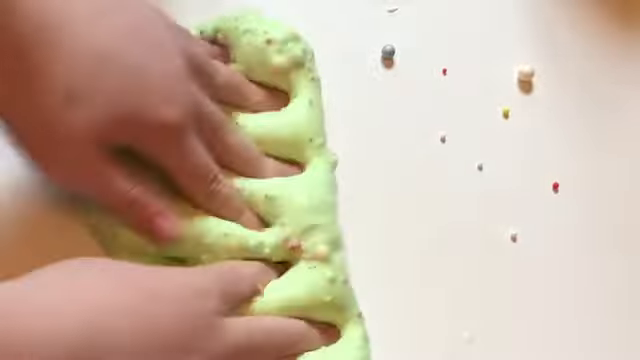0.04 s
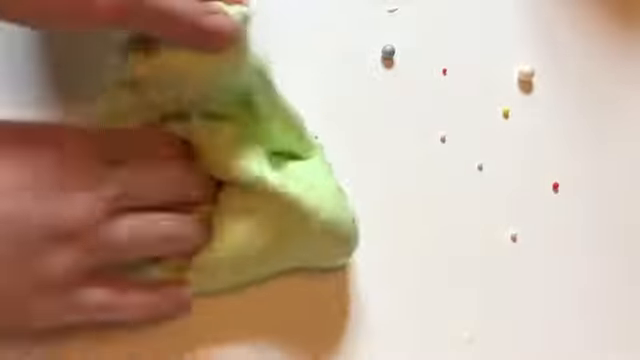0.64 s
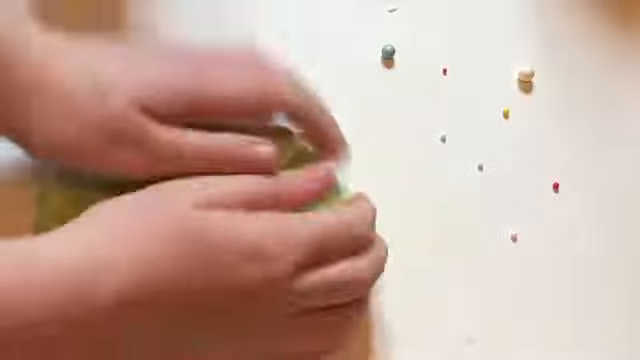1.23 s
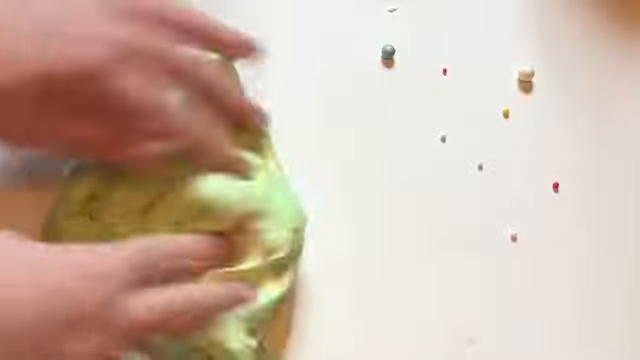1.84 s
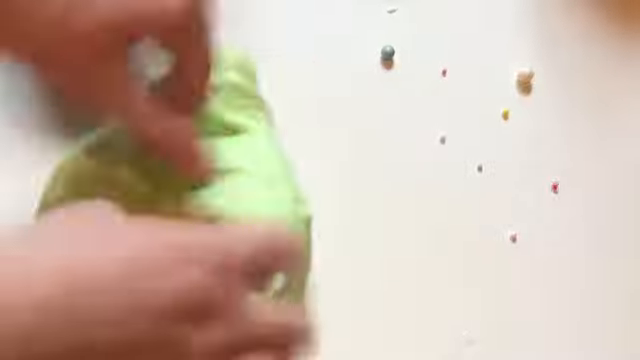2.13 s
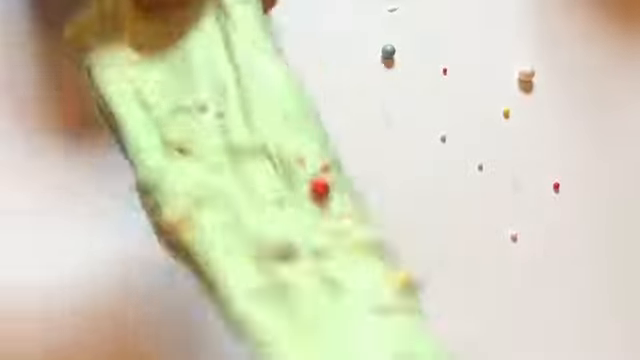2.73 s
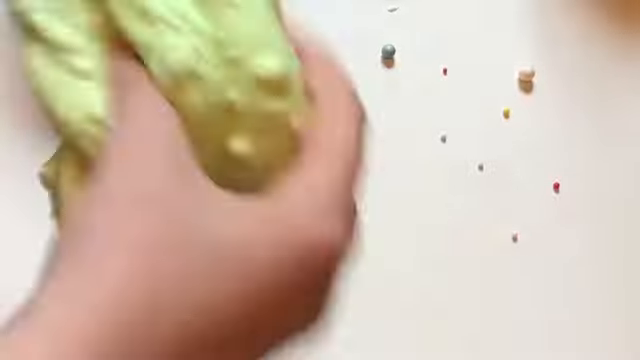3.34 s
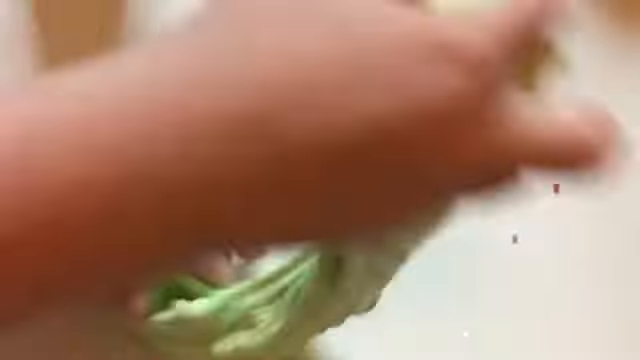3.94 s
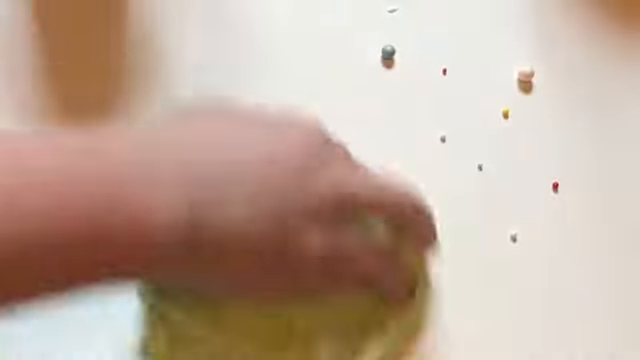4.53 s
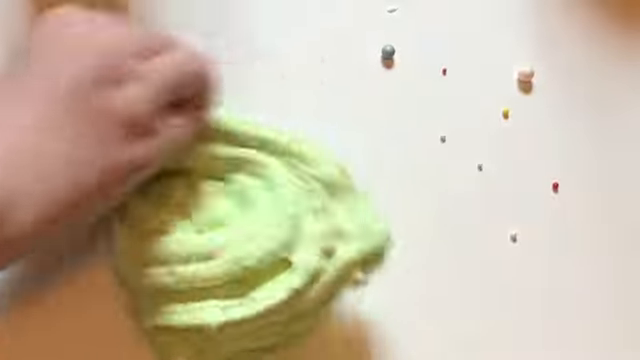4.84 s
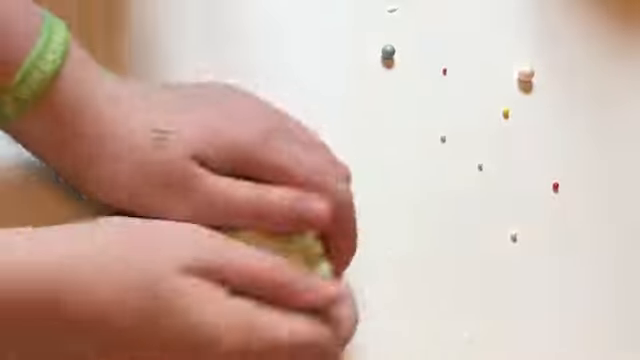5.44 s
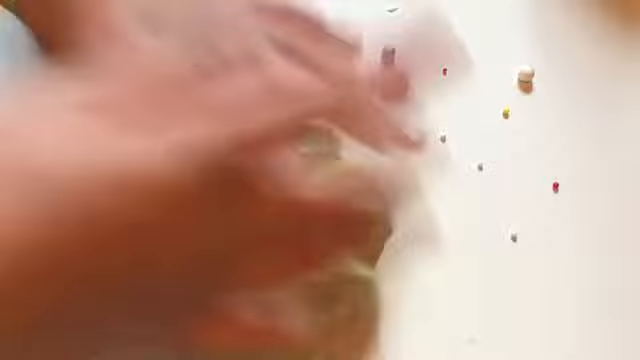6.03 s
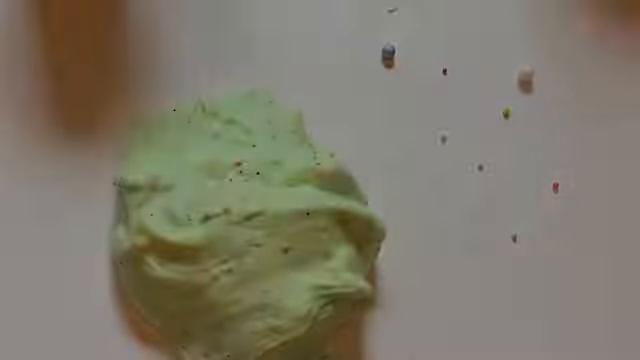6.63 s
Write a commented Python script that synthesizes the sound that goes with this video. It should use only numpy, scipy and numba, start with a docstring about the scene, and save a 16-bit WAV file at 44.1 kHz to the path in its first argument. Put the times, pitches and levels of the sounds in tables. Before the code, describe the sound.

Hands knead and stretch sticky slime close by, making wet crackles, squelches and sharp snaps of bursting air pockets.

```python
"""Over faint room tone, a wet crackle swells into snaps: two hands knead slime on a table, close by.
Trapped air pockets snap open or gulp out with a sliding pitch, loudest near 1.6 s and 5.7 s.
Tiny pores and tacky threads crackle as the slime is pressed, folded, stretched and peeled.
The walls of the small room answer each snap."""
import sys
import numpy as np
from scipy import signal
from scipy.fft import rfft, irfft
from scipy.io import wavfile
from scipy.ndimage import uniform_filter1d
from numba import njit

SR = 44100
rng = np.random.default_rng(int(sys.argv[2]) if len(sys.argv) > 2 else 0)


def transcribe(signal):
    """Save signal, clipped to [-1, 1], as a 16-bit WAV file at the path in sys.argv[1]."""
    frames = np.atleast_2d(signal).T
    limited = np.clip(frames, -1, 1)
    pcm = np.round(limited * 32767).astype(np.int16)
    wavfile.write(sys.argv[1], SR, pcm)


N = 294569

# steady rumble and hiss: freq_hz, gain_db
ROOM_TONE_SPECTRUM = [(20, -20.5), (40, -10), (65, 0.5), (105, 3), (180, -0.5), (400, -4.5), (1000, -12),
                      (2100, -15), (5000, -20.5), (15000, -24), (16000, -23)]
# hands press or fold, levels before layer trim: full_effort_s, hold_s, squash_db, pores_db, threads_db
PRESS_STROKES = [(0.174, 0.031, -49.5, -51, -52), (0.434, 0.039, -60.5, -54, -57),
                 (0.593, 0.08, -64, -60, -60.5), (0.739, 0.016, -62.5, -67, -63.5),
                 (0.87, 0.027, -55.5, -54, -53.5), (.955, .015, -59.5, -64, -68),
                 (1.138, 0.037, -51, -56.5, -57), (1.508, 0.12, -58.5, -61, -55.5),
                 (1.726, 0.13, -63, -55.5, -55), (2.16, 0.056, -49.5, -55.5, -52.5),
                 (2.444, 0.033, -58.5, -56.5, -58), (2.525, 0.057, -59.5, -55.5, -56),
                 (3.774, 0.046, -71, -91, -80.5), (4.035, .012, -64, -65, -67),
                 (5.935, 0.074, -56.5, -52.5, -53)]
# slime stretches or peels, levels before layer trim: full_effort_s, hold_s, threads_db, pores_db
PULL_STROKES = [(0.353, 0.024, -80, -66.5), (0.52, 0.037, -69, -66), (1.429, 0.03, -71, -67.5),
                (1.882, 0.11, -67, -66.5), (2.615, .03, -69, -81), (2.715, 0.019, -68, -72),
                (2.851, .03, -67, -70), (2.952, 0.027, -60.5, -68), (3.045, 0.014, -65, -62),
                (3.122, 0.035, -66.5, -69), (3.265, 0.049, -63.5, -63), (3.39, .005, -75, -65),
                (3.45, .01, -71.5, -63), (3.486, 0.039, -62.5, -61.5), (3.56, .2, -67, -70.5),
                (3.866, 0.022, -64, -62), (3.929, 0.063, -69.5, -64.5), (4.137, .005, -72, -65.5),
                (4.23, .13, -67.5, -67), (4.383, .06, -74, -76), (4.509, .015, -64, -63),
                (4.611, .01, -74.5, -74.5), (4.668, .03, -70, -64), (4.763, 0.023, -67, -68),
                (4.85, 0.28, -75.5, -84), (5.16, 0.017, -65.5, -72), (5.27, .1, -75, -74.5),
                (5.412, 0.06, -65, -66.5), (5.533, .08, -71.5, -80), (5.654, 0.1, -60, -62),
                (5.867, 0.097, -58.5, -63), (6.017, 0.011, -68, -64), (6.085, 0.015, -58.5, -55.5),
                (6.508, 0.038, -57.5, -61.5)]
# squashed mass, wet pores, tacky threads: freq_hz, gain_db
SQUASH_SPECTRUM = [(25, -32), (50, -13), (100, -5.5), (180, -1), (300, 2.5), (480, -4.5), (800, -18.5),
                   (2000, -47.5)]
PORE_SPECTRUM = [(250, -21), (500, -3), (900, -2), (1400, -3.5), (2100, -6), (3000, -12.5), (7000, -40.5)]
THREAD_SPECTRUM = [(1000, -22), (2200, -3.5), (3500, -1.5), (5500, -2), (8000, -5), (12000, -7),
                   (16000, -6.5)]
# air pockets bursting: start_s, level_db, cavity_hz, body_db, crack_db
POCKET_SNAPS = [(0.1614, -5, 3970, -17.5, -10), (.1787, -30, 6450, -11, -10), (.199, -17.5, 8100, 2, -16.5),
                (0.357, -26, 13100, -16, 3), (0.4227, -24, 2000, 0, 0), (0.4728, -28, 2700, -8, -11),
                (0.486, -23, 2700, -6, -5), (.5545, -33.5, 2500, 8, -1), (.630, -27.5, 1970, -10, -7.5),
                (0.7407, -32, 1400, -10, -26), (.867, -26.5, 4600, -2, -13), (0.9077, -28, 1800, -3, -3),
                (0.941, -27.5, 1560, 5, -21), (0.9653, -33.5, 1480, -3, -8), (1.018, -33.5, 1910, 4, -22),
                (1.1194, -29.5, 5700, -3, -14), (1.1412, -23.5, 1500, 6, -26),
                (1.5088, -25.5, 4050, 1, -11), (1.5711, 11, 4000, -7.5, -19),
                (1.5985, -1.5, 4500, -2, -1.5), (1.861, -31, 1500, -3, -16), (2.0793, -33, 1295, -2.5, -16),
                (2.168, -23, 5000, 2, -4), (2.178, -28, 4000, -5, -14), (2.1928, -24, 5470, -18, -20),
                (2.3878, -28, 4290, 2.5, -8), (2.4477, -25.5, 5000, -4, -6), (2.5332, -28.5, 3000, -8, -24),
                (2.575, -25.5, 3200, 5.5, -15), (2.580, -26.5, 3000, 7, -7), (2.710, -33.5, 4030, -2, -3),
                (2.8761, -34, 2045, 5.5, -14.5), (3.0366, -33.5, 1994, 6.5, 5),
                (3.1493, -36.5, 12120, -12, -5), (3.1912, -31, 2010, 3.5, -2),
                (3.3765, -40, 12220, -6.5, -6.5), (3.4495, -32.5, 1685, -10, -19),
                (3.5533, -34.5, 12140, -3, 1), (3.612, -32.5, 3010, -4.5, -9.5),
                (3.6735, -31.5, 4000, -8, -9), (3.8763, -32.5, 1930, -8, -10.5),
                (4.0279, -24, 1900, 2.5, -8), (4.1218, -35.5, 1610, -5, -1), (4.5713, -23, 3300, -2, -22),
                (5.599, -32, 4950, 5, -6), (5.642, -28.5, 1800, 11, -3), (5.6705, -25, 6900, 3, -6),
                (5.712, -13, 4000, -14, -6), (5.741, 1.5, 9000, -4, -5), (5.7605, 1.5, 8960, -16, -9.5),
                (5.812, -11, 6660, -11, -4), (5.8719, -23, 9000, -16, -7)]
# air pushed through a fold: start_s, level_db, start_hz, end_hz
POCKET_GULPS = [(.1632, -29.5, 816, 300), (.164, -42, 260, 109), (0.176, -36, 310, 132),
                (.179, -38, 990, 700), (.2, -27, 1270, 650), (0.2028, -40, 504, 160), (.424, -42, 915, 790),
                (.451, -40.5, 960, 790), (.7415, -42, 960, 296), (.869, -45, 726, 450),
                (.908, -38, 900, 550), (0.943, -38.5, 590, 150), (1.02, -50, 383, 130),
                (1.1216, -37.5, 1210, 740), (1.138, -32.5, 774, 557), (1.141, -34, 332, 211),
                (1.165, -43, 280, 220), (1.354, -52.5, 259, 149), (1.5709, -19.5, 1330, 1130),
                (1.5719, -32.5, 300, 109.8), (1.5737, -6, 2960, 7700), (1.862, -43.5, 660, 250),
                (2.082, -42.5, 500, 148), (2.178, -31, 862, 770), (2.214, -43.5, 377, 195),
                (2.373, -39, 203, 159), (2.388, -37.5, 260, 90), (2.395, -42, 2250, 2540),
                (2.396, -42, 125, 100), (2.440, -42.5, 834, 775), (2.954, -51.5, 850, 600),
                (3.042, -52, 994, 690), (3.139, -48, 1200, 705), (3.192, -47, 1000, 708),
                (3.2019, -46, 1300, 500), (3.449, -47, 849, 469), (4.031, -46.5, 333.3, 90),
                (4.045, -49, 119.6, 70.1), (4.245, -53, 956, 705), (4.571, -44, 779, 400),
                (4.697, -51, 695, 520), (4.781, -53.5, 776, 624), (5.172, -51.5, 1601, 1306),
                (5.7125, -28, 3500, 4200), (5.7415, -24.5, 2100, 1604), (5.989, -43, 1200, 696),
                (6.007, -33, 3590, 4400), (6.093, -42.5, 1020, 1154)]
# wall reverberation: band_hz, level_db, t60_s
WALL_BANDS = [(120, -7.5, 0.24), (300, -8.5, .22), (800, -7, .21), (1999, -11.5, .28), (4200, -8, .31),
              (7600, -11, .19), (15000, -9, .18)]


def undb(db):
    """Decibels to gain."""
    return 10 ** (np.asarray(db) / 20)


def unit_rms(x):
    """Scale to rms 1."""
    return x / np.sqrt(np.mean(x ** 2))


def pulse(magnitude):
    """Minimum-phase pulse with this magnitude spectrum."""
    cepstrum = irfft(np.log(magnitude + 1e-6))
    half = len(cepstrum) // 2
    cepstrum[1:half] *= 2
    cepstrum[half + 1:] = 0
    return irfft(np.exp(rfft(cepstrum)))


def colour(x, spectrum):
    """Filter by (freq_hz, gain_db) points; output at rms 1."""
    freq_hz, gain_db = np.transpose(spectrum)
    log_f = np.log(np.fft.rfftfreq(4096, 1 / SR) + 1)
    magnitude = undb(np.interp(log_f, np.log(freq_hz), gain_db))
    return unit_rms(signal.oaconvolve(x, pulse(magnitude))[:len(x)])


def add(track, start_s, sound):
    """Mix a sound in at start_s."""
    i = max(int(start_s * SR), 0)
    track[i:i + len(sound)] += sound[:max(len(track) - i, 0)]


def room_tone(level_db=-67):
    """Faint steady rumble and hiss."""
    return undb(level_db) * colour(rng.standard_normal(N), ROOM_TONE_SPECTRUM)


def stroke(full_effort_s, hold_s, attack_s, release_s):
    """Effort of one hand movement: exponential build, hold, exponential release."""
    t = np.arange(N) / SR - full_effort_s
    log_effort = np.minimum(t, 0) / attack_s - np.maximum(t - hold_s, 0) / release_s
    return np.exp(np.maximum(log_effort, -20))


@njit
def grains(start_sample, pitch_hz, glide_ratio, cycles, gain):
    """Tiny damped sines, each sliding in pitch while it fades by 60 dB."""
    out = np.zeros(N)
    for k, start in enumerate(start_sample):
        length = int(cycles[k] * SR / pitch_hz[k]) + 2
        phase = 0.
        for i in range(min(length, N - start)):
            phase += 2 * np.pi * pitch_hz[k] * (1 + glide_ratio[k] * i / length) / SR
            out[start + i] += gain[k] * np.exp(-6.9 * i / length) * np.sin(phase)
    return out


def crackle(spectrum, low_hz, high_hz, per_s, cycles, spread_db, smear_db, clump_db, even_s):
    """Small bursts, mostly faint, a few strong, over the smooth smear of skin on slime."""
    when, pitch, slide, length, strength = rng.random((int(per_s * N / SR), 5)).T
    pitch_hz = low_hz * (high_hz / low_hz) ** pitch
    gain = undb(-spread_db * np.log(1 - .98 * strength)) * pitch_hz / high_hz
    bursts = grains((when * N).astype(np.int64), pitch_hz, .7 * slide - .55, cycles * (.5 + length), gain)
    swarm = colour(bursts, spectrum) + undb(smear_db) * colour(rng.standard_normal(N), spectrum)
    # skin sticks and lets go: short clumps
    grip = unit_rms(uniform_filter1d(rng.standard_normal(N), int(.0094 * SR)))
    swarm *= undb(clump_db * grip)
    # even out the loudness so no stray click sticks out
    return swarm / np.sqrt(uniform_filter1d(swarm ** 2, int(even_s * SR)) + 1e-6)


def kneading():
    """Pressing squashes the mass; pressing and pulling both burst wet pores and tear tacky threads."""
    squash_gain = pore_gain = thread_gain = 0
    for full_effort_s, hold_s, squash_db, pores_db, threads_db in PRESS_STROKES:
        effort = stroke(full_effort_s, hold_s, attack_s=.018, release_s=.016)
        squash_gain += undb(squash_db) * effort
        pore_gain += undb(pores_db) * effort
        thread_gain += undb(threads_db) * effort
    for full_effort_s, hold_s, threads_db, pores_db in PULL_STROKES:
        effort = stroke(full_effort_s, hold_s, attack_s=.02, release_s=.014)
        pore_gain += undb(pores_db) * effort
        thread_gain += undb(threads_db) * effort
    squash = squash_gain * crackle(SQUASH_SPECTRUM, low_hz=90, high_hz=600, per_s=510, cycles=1.1,
                                   spread_db=7.5, smear_db=-6.5, clump_db=.5, even_s=.081)
    pores = pore_gain * crackle(PORE_SPECTRUM, low_hz=450, high_hz=2800, per_s=550, cycles=15,
                                spread_db=2.5, smear_db=-9, clump_db=1.5, even_s=.049)
    threads = thread_gain * crackle(THREAD_SPECTRUM, low_hz=2000, high_hz=13000, per_s=2600, cycles=27,
                                    spread_db=3.5, smear_db=-2.5, clump_db=2, even_s=.042)
    return undb(-2) * squash + undb(-2) * pores + undb(-1.5) * threads  # layer trim


def near_echoes(level_db, table_s=.0004, table_db=-4, ripple_depth=.55, size=2048):
    """Spectrum of a snap's direct path, table bounce and scatter off the hands."""
    t = np.arange(size) / SR
    # large pockets crack cleanly; small ones break into a longer wet cluster
    scatter_db = -.14 * level_db
    scatter_s = .004 * undb(-.17 * level_db)
    paths = rng.standard_normal(size) * np.exp(-t / scatter_s)
    paths *= undb(scatter_db) / np.linalg.norm(paths)
    paths[0] = 1
    paths[int(table_s * SR * rng.uniform(.7, 1.3))] += undb(table_db)
    response = rfft(paths)
    # flatten the random echoes' peaks and notches so each snap keeps its colour
    return response * rfft(pulse(np.abs(response) ** (ripple_depth - 1)))


def snap(level_db, cavity_hz, body_db, crack_db,
         cavity_octaves=.61, body_hz=1450, body_octaves=1.095, low_hz=190, lag_cycles=1.1, size=2048):
    """A slime film breaks: broad crack, cavity ring, thump of the surrounding mass."""
    freq_hz = np.fft.rfftfreq(size, 1 / SR) + 1
    cavity = np.exp(-.5 * np.abs(np.log2(freq_hz / cavity_hz) / cavity_octaves) ** 3)
    body = undb(body_db) * np.exp(-.5 * (np.log2(freq_hz / body_hz) / body_octaves) ** 2)
    low_cut = freq_hz ** 2 / (freq_hz ** 2 + low_hz ** 2)
    burst = pulse(np.sqrt(cavity ** 2 + body ** 2 + undb(crack_db) ** 2) * low_cut)
    # thin film yields first, heavy mass last: lows come late
    lag = np.exp(-2j * np.pi * lag_cycles * np.log((freq_hz + low_hz) / SR))
    burst = irfft(rfft(burst) * near_echoes(level_db, size=size) * lag)
    return undb(level_db) * burst / np.linalg.norm(burst)


def gulp(start_hz, end_hz, rise_s=.00056, ref_t60_s=.019, ref_hz=766):
    """Air rings a pocket; pitch slides as the opening changes. Larger, lower pockets ring longer."""
    t60_s = ref_t60_s * (ref_hz / start_hz) ** .54
    t = np.arange(int(1.4 * t60_s * SR)) / SR
    pitch_hz = end_hz + (start_hz - end_hz) * np.exp(-t / (.35 * t60_s))
    envelope = 1.4 * (1 - np.exp(-t / rise_s)) * np.exp(-np.log(1000) * t / t60_s)
    return envelope * np.sin(2 * np.pi * np.cumsum(pitch_hz) / SR)


def wall_reverb(x, early_s=.003, gap_s=.0105, build_s=.001):
    """Weak early reflections, then a dense tail from the walls; the top treble fades first."""
    t = np.arange(int(.6 * SR)) / SR
    band_hz, levels_db, t60s_s = np.transpose(WALL_BANDS)
    log_f = np.log(np.fft.rfftfreq(len(t), 1 / SR) + 1)
    noise = rfft(rng.standard_normal(len(t)))
    onset = 1 - np.exp(-np.maximum(t - gap_s, 0) / build_s) + .42 * (t > early_s)
    tail = 0
    for band_weights, level_db, t60_s in zip(np.eye(len(band_hz)), levels_db, t60s_s):
        fade = onset * np.exp(-np.log(1000) * t / t60_s)
        band = irfft(noise * np.interp(log_f, np.log(band_hz), band_weights), len(t))
        tail += undb(level_db) * band * fade / np.linalg.norm(fade)
    return signal.fftconvolve(x, tail)[:N]


def scene():
    """Slime crackle, snaps and gulps in the room; mono."""
    slime = kneading()
    for start_s, level_db, cavity_hz, body_db, crack_db in POCKET_SNAPS:
        add(slime, start_s, snap(level_db, cavity_hz, body_db, crack_db))
    for start_s, level_db, start_hz, end_hz in POCKET_GULPS:
        add(slime, start_s, undb(level_db) * gulp(start_hz, end_hz))
    return (slime + wall_reverb(slime) + room_tone())[None]


def record(dry):
    """Clip at full scale, thin the deep bass, cut the top."""
    low_hz, top_hz = 45, 15900
    highpass = signal.butter(2, low_hz, "highpass", fs=SR, output="sos")
    lowpass = signal.ellip(10, .2, 70, top_hz, fs=SR, output="sos")
    thinned = signal.sosfilt(highpass, np.clip(dry, -1, 1))
    return signal.sosfilt(lowpass, thinned)


dry = scene()
out = record(dry)
transcribe(out)
```